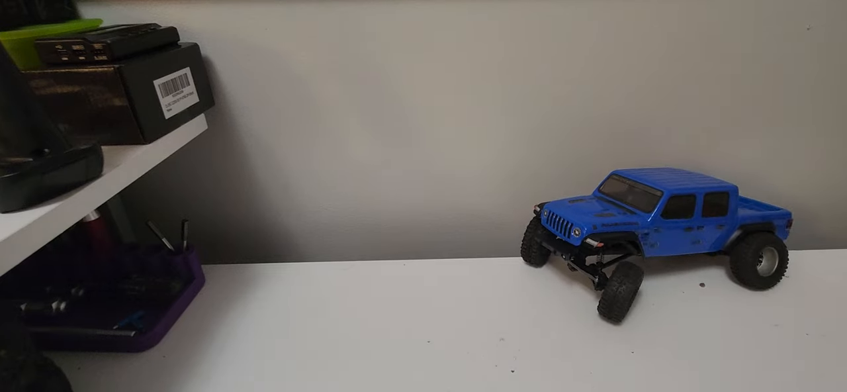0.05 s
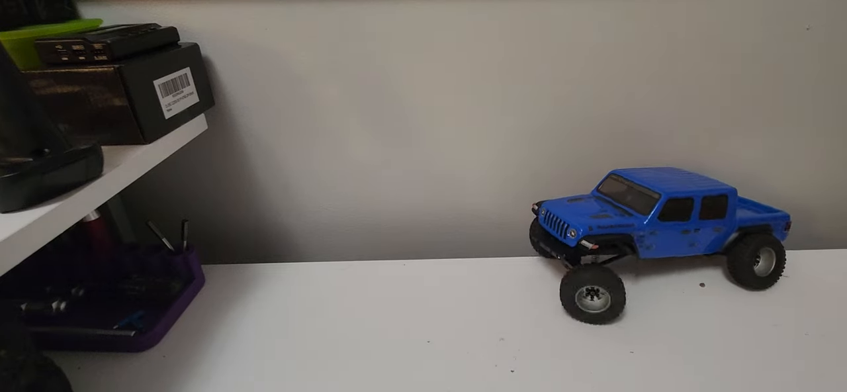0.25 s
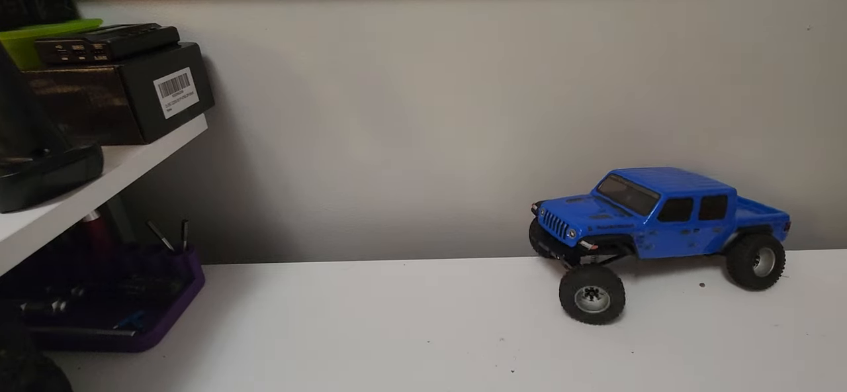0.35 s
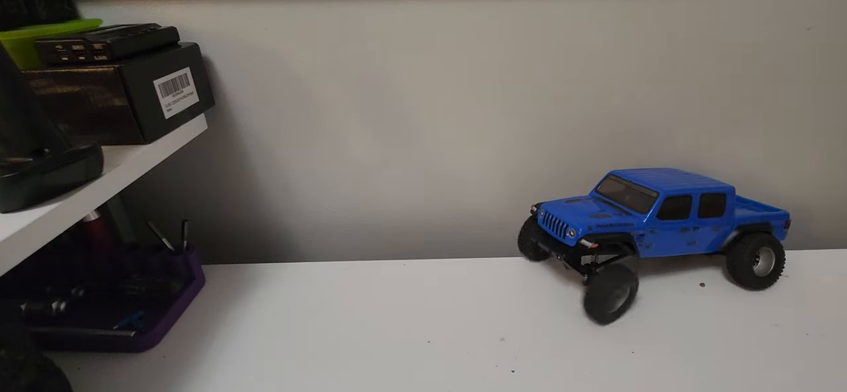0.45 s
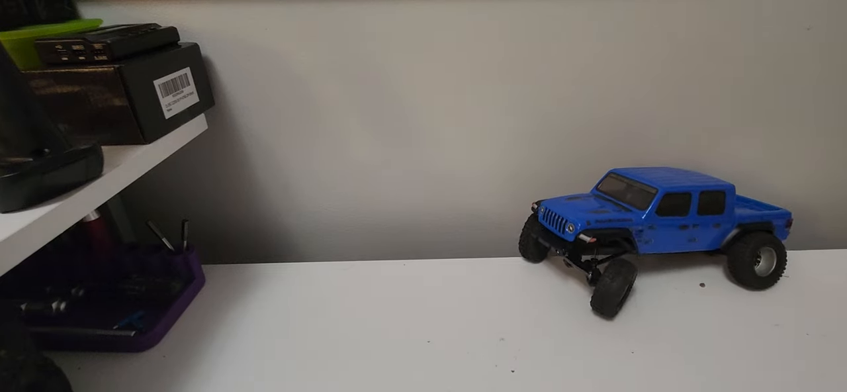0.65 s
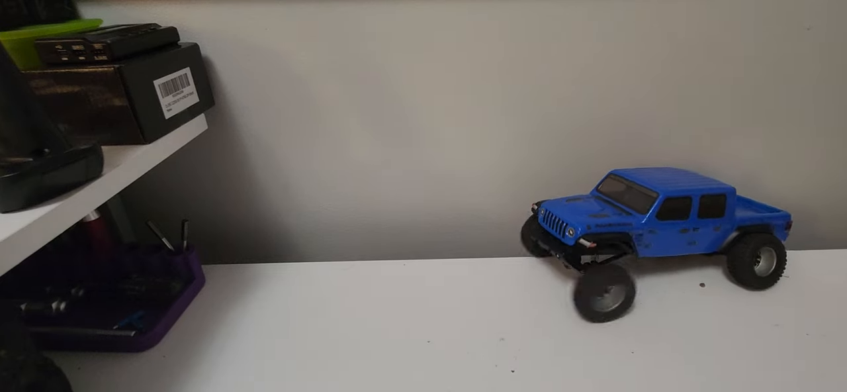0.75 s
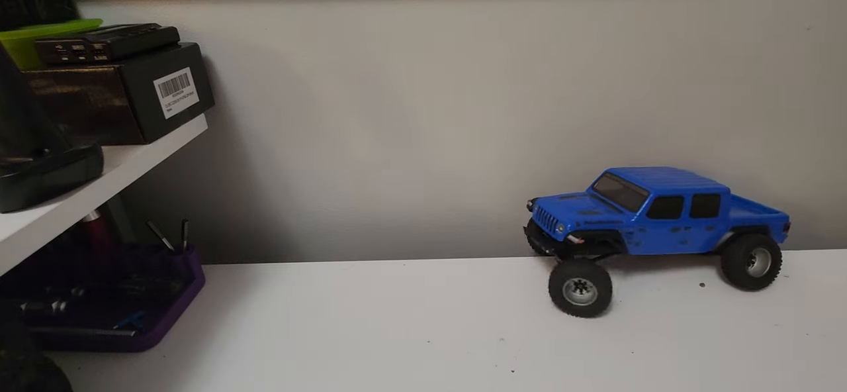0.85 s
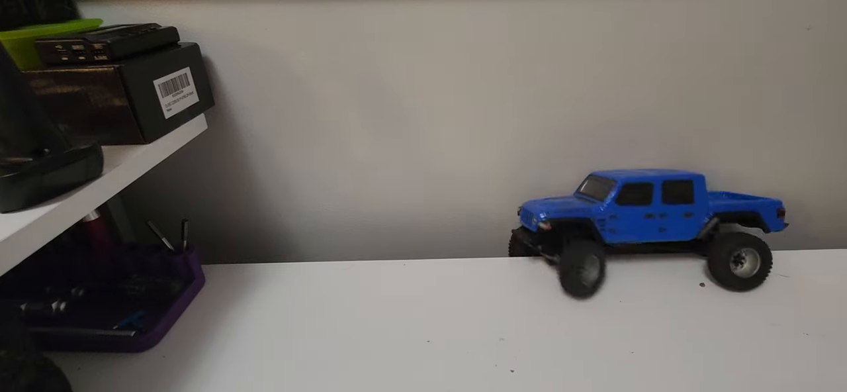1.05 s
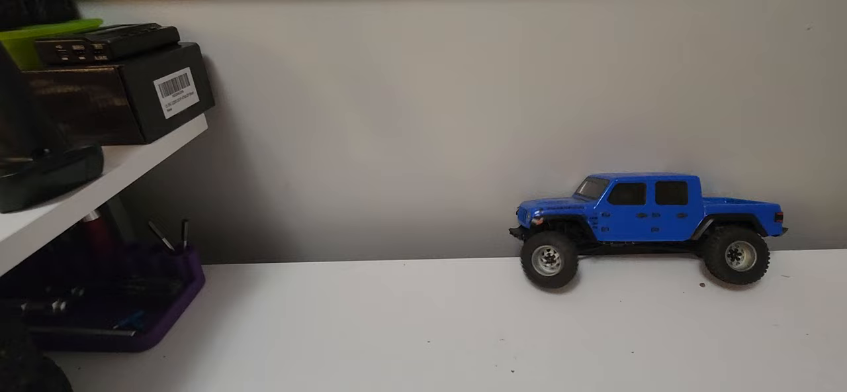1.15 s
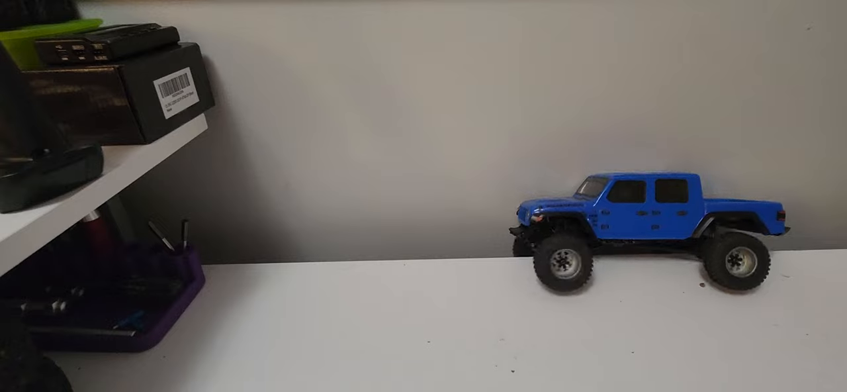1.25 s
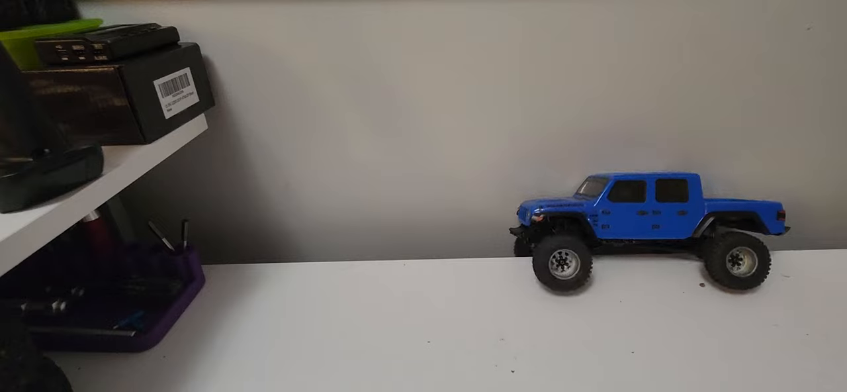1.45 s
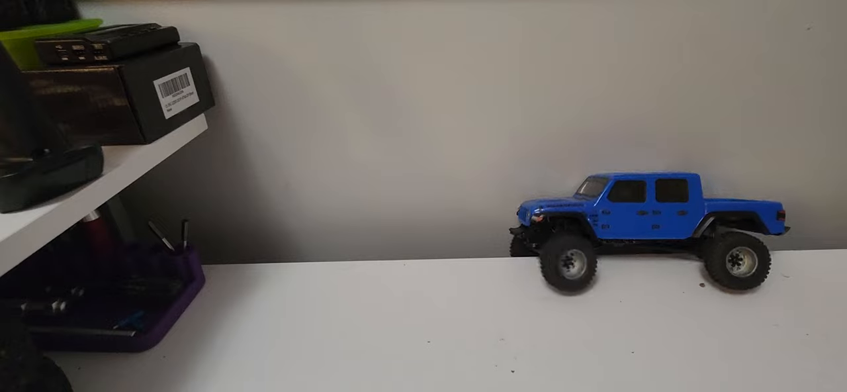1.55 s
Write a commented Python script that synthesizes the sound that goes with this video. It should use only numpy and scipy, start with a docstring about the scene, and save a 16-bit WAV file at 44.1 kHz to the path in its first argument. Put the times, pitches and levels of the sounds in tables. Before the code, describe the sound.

A toy truck's steering servo whirrs over faint low hum, close in a small room. Thin, buzzing gear bursts with ticks and plastic clacks come at about 0.2-0.4, 0.5-0.65 and 0.8-0.95 seconds. A fourth starts at 1.02; loud knocks at 1.1 and 1.2 bring desk ring, clatter and groaning tyres. The whirr wavers until 1.5, then a faint tick at 1.6.

```python
"""A small radio-controlled truck on a desk in a small, quiet room swings its front wheels to and fro.
A faint gear rattle dies away over a quiet hum; then the first of four swings ticks as gear slack is taken up.
In each swing loose links clack, and gear teeth in the steering servo whine, rattle and growl.
On the fourth the truck drops onto the desk: thumps, desk ring and clatter, then rocking and groaning tyres.
The servo hunts for its position, its pitch going up and down, and a last faint tick and rattle follow."""
import sys
import numpy as np
from scipy import signal
from scipy.fft import rfft, irfft, next_fast_len
from scipy.io import wavfile
from scipy.ndimage import uniform_filter1d, map_coordinates

SR = 44100
rng = np.random.default_rng(int(sys.argv[2]) if len(sys.argv) > 2 else 0)


def pcm_store(signal):
    """Save signal as 16-bit PCM."""
    levels = np.round(np.clip(np.atleast_2d(signal), -1, 1) * 32767)
    wavfile.write(sys.argv[1], SR, levels.astype(np.int16).T)


N = 70560  # length in samples

# tone of the quiet background hum: (frequency [Hz], relative level [dB])
HUM_COLOUR = [(20, 7.5), (60, 4.5), (125, 4.5), (250, -7.5), (500, -19.5), (950, -18), (2000, -29),
              (4200, -37.5), (5500, -23.5), (8000, -54), (16000, -41)]
HUM_DB = -58.5

# tone of the direct sound, its treble shaded by the body: (frequency [Hz], level [dB])
DIRECT_COLOUR = [(200, -3), (700, -1), (2000, -1), (6000, -9.5), (16000, -5)]
# tone of the reflections: (frequency [Hz], level [dB])
ECHO_COLOUR = [(40, -36), (150, -11.5), (300, -12), (600, -3.5), (3000, 3.5), (8000, 1.5), (16000, -6.5)]
EARLY_DB, EARLY_T60_S, EARLY_DELAY_S = 0, 0.02, 0.0008
TAIL_DB, TAIL_T60_S, TAIL_DELAY_S = -6.5, 0.21, 0.007
ROOM_EVEN_HZ = 200  # width of the bands that are evened out
LEFT_LAG_S = 0.00007  # the truck stands to the right, so the left side hears it later
LOW_CUT_HZ, TOP_HZ = 31.6, 15850

# the chassis rocking on its soft tyres: (time [s], level [dB], time to fall 60 dB [s])
WOBBLES = [(0.263, -40, 0.7), (0.52, -44.5, 0.68), (0.669, -47.5, 0.3), (0.857, -45, 0.78),
           (1.29, -31, 0.71)]
# tone of that rumble: (frequency [Hz], relative level [dB])
WOBBLE_COLOUR = [(20, -27.5), (50, -3.5), (72, -3), (110, -6.5), (200, -28), (600, -78)]
WOBBLE_RISE_S = 0.0057

# tyres groaning on the desk: (time [s], pitch [Hz], time to fall 60 dB [s], level [dB])
RUBS = [(1.21, 255, .24, -29), (1.256, 975, .1, -34), (1.336, 880, .18, -34.5), (1.452, 555, .22, -44)]
RUB_RISE_S = 0.0026
RUB_WAVER, RUB_WAVER_HZ = 0.018, 87.1  # share of the pitch, speed of its wander

# loose body parts clattering after the landings: (time [s], level [dB], time to fall 60 dB [s])
CLATTERS = [(1.099, -34, 0.22), (1.173, -36, .08), (1.196, -25.5, 0.13), (1.223, -37, 0.3)]
CLATTER_PER_S, CLATTER_LOW_HZ, CLATTER_HIGH_HZ = 1300, 383, 2200
CLATTER_CYCLES = 18  # swings until a chatter has fallen 60 dB
CLATTER_SCATTER_DB, CLATTER_PAN_DB = 3, 6.5

# wheels and chassis landing: (time [s], thump level [dB], thump pitch [Hz], desk ring level [dB],
# crash level [dB], time for the crash to fall 60 dB [s], crash low-pass [Hz])
KNOCKS = [(1.095, -13.5, 88.7, -24, -7, 0.031, 8994), (1.101, -21, 114.5, -29, -34.5, 0.18, 2982),
          (1.1702, -54, 99, -43, -20, 0.057, 12000), (1.1727, -18.5, 104, -25, -23, 0.13, 2550),
          (1.195, -24, 153.3, -20.5, -12, 0.03, 3950), (1.2023, -24, 188.3, -27.5, -14.5, 0.091, 1790),
          (1.214, -36, 211, -31.5, -27, .05, 3000), (1.2227, -42, 136.3, -28.5, -16, 0.046, 1200)]
# ringing of wheel and chassis: (multiple of the thump pitch [-], time to fall 60 dB [s], level [dB])
THUMP_MODES = [(1, 0.085, 6.5), (3.9, 0.13, -6.5), (12.7, 0.06, -9)]
# ringing of the desk top: (frequency [Hz], time to fall 60 dB [s], level [dB])
DESK_MODES = [(53, 0.59, 1), (80.5, 0.41, 1.5), (117.3, 0.55, -9), (145.5, 0.22, 0), (192.7, 0.437, -6.5),
              (239.8, 0.52, -9), (258.7, 0.35, -2), (357, 0.15, -4), (459, 0.23, -11.5), (654, 0.15, -17),
              (747, 0.057, -10)]
# tone of the shaken plastic body: (frequency [Hz], relative level [dB])
CRASH_COLOUR = [(50, -17), (150, 9), (300, 1), (500, 6.5), (750, -3.5), (1200, 1.5), (1700, -9.5),
                (2400, -11.5), (3800, -9.5), (5300, -10), (9000, -16), (16000, -4.5)]

# clacks of the steering links, and dull bumps of the servo at its end stops: (time [s], level [dB], # time to
# fall 60 dB [s], low-pass [Hz], axle ring level [dB])
CLACKS = [(0.2373, -27, 0.054, 11900, -39), (0.349, -33.5, 0.073, 1070, -56),
          (0.4893, -26, 0.049, 14000, -43), (0.531, -40.5, 0.081, 2500, -59),
          (0.598, -47, 0.023, 3500, -65), (0.862, -31.5, 0.034, 3470, -38.5),
          (0.977, -40, 0.089, 6952, -66), (1.0432, -27.5, 0.068, 12000, -39.5),
          (1.346, -32.5, 0.067, 1610, -55)]
# tone of the links: (frequency [Hz], relative level [dB])
CLACK_COLOUR = [(120, -39), (300, 0.5), (480, -3), (720, -0.5), (950, -9.5), (1350, 0.5), (1900, -13.5),
                (3200, -10), (5000, -12), (8000, -17.5), (16000, -11)]
# ringing of the axle: (frequency [Hz], time to fall 60 dB [s], level [dB])
AXLE_MODES = [(430, 0.069, 4), (716, 0.063, -5.5)]
CLACK_LOW_CUT_HZ = 360

# ticks of gear slack: (time [s], level [dB], direction [0 left, 1 right])
TICKS = [(0.2055, -33.5, 0), (0.46, -29.5, 1), (0.8204, -35, 0), (1.0157, -30, 1), (1.59, -51, 0)]
# ringing of the steering gear: (frequency [Hz], time to fall 60 dB [s], level turning left [dB],
# level turning right [dB])
GEAR_MODES = [(770, 0.078, -10, -19), (1410, 0.043, 3.5, -27), (1580, 0.11, -28, -9), (1992, 0.016, -12, 0),
              (4476, 0.012, -33, 2.5), (5450, 0.0094, -14, -5), (6400, 0.01, -22, -14)]
# tone of the scrape in a tick: (frequency [Hz], relative level [dB])
TICK_COLOUR = [(250, -12), (900, -7.5), (1450, 7.5), (2400, -6.5), (3300, -5.5), (4400, 4), (6000, 8.5),
               (8000, -0.5), (10000, -7), (16000, -4)]
SCRAPE_DB, SCRAPE_HOLD_S, SCRAPE_T60_S = 1.5, 0.002, 0.0075
TICK_RING_DB, TICK_LOW_CUT_HZ = 0.5, 1120

# meshing gears, one list per swing: (time [s], tooth rate [Hz], lower whine level [dB],
# upper whine level [dB])
MESH = [
    [(.228, 3700, -55, -50), (.246, 3650, -39, -48), (.253, 3740, -27, -46), (.264, 3240, -34, -34),
     (.275, 3280, -36, -44), (.286, 3530, -35, -44), (.295, 3250, -35, -28), (.306, 2910, -28, -34),
     (.326, 3070, -37, -36), (.338, 2950, -29, -32), (.348, 2640, -33, -33), (.365, 2400, -60, -60)],
    [(.497, 3394, -50, -60), (.512, 3607, -31, -52), (.527, 3690, -19, -35), (.536, 3420, -31, -35),
     (.56, 3450, -28, -33), (.576, 3030, -37, -22), (.588, 3043, -40, -28), (.602, 2960, -34, -22.5),
     (.614, 2690, -30, -37), (.63, 2383, -65, -64)],
    [(.825, 3000, -52, -48), (.842, 2790, -31, -32), (.852, 3000, -36, -32), (.863, 3380, -44, -46),
     (.872, 3400, -34, -44), (.879, 3200, -33, -28), (.888, 3040, -40, -39), (.904, 3150, -39, -32),
     (.917, 2960, -29, -36), (.93, 2610, -37, -28), (.945, 2400, -58, -58)],
    [(1.048, 3393, -56, -55), (1.065, 3546, -30, -39), (1.08, 3585, -22.5, -43), (1.1, 3732, -27, -47),
     (1.112, 3230, -54, -41), (1.12, 3007, -38, -24), (1.13, 2589, -32, -28.5), (1.15, 3614, -42, -42),
     (1.2, 3852, -42, -50), (1.213, 3657, -33, -40), (1.225, 3254, -28.5, -41), (1.237, 3593, -52, -43),
     (1.255, 3854, -34.5, -43), (1.272, 3703, -49, -39), (1.3, 2701, -54, -64), (1.317, 3043, -41, -39),
     (1.333, 3432, -35, -39), (1.352, 3702, -42, -34), (1.375, 3764, -75, -59), (1.4, 3917, -40, -42),
     (1.435, 3667, -72, -57), (1.46, 3913, -45, -46), (1.49, 3508, -78, -65)],
]
# parts of the whine: (multiple of the tooth rate [-], level [dB], which whine [0 lower, 1 upper])
HARMONICS = [(2, -0.5, -1), (3, -13, 0), (4, 4, 1), (5, -12, 1)]
# how the servo case colours the whine: (frequency [Hz], level [dB])
WHINE_COLOUR = [(2500, -10), (4500, -7), (5600, -4.5), (7200, -0.5), (8300, 6.5), (9700, -10),
                (10600, -3.5), (12100, -0.5), (13600, -0.5), (15000, -0.5), (17000, -4)]
JITTER, JITTER_HZ = 0.004, 500.7  # share of the pitch, speed of its wander
FLUTTER_DB, FLUTTER_HZ = 2, 257

# gear rattle, one list per burst: (time [s], level [dB])
RATTLE = [
    [(0, -49.5), (.03, -74), (.07, -83)],
    [(.17, -71), (.19, -64), (.221, -51.5), (.23, -30.5), (.262, -32), (.277, -33), (.3, -35),
     (.348, -37.5), (.37, -45), (.41, -77)],
    [(.465, -81), (.486, -44), (.493, -40.5), (.515, -26.5), (.55, -33.5), (.61, -31), (.626, -36.5),
     (.65, -70), (.7, -80)],
    [(.77, -57), (.782, -49.5), (.816, -34.5), (.835, -35.5), (.88, -33), (.935, -35.5), (.955, -56),
     (1.0, -83)],
    [(1.02, -47), (1.042, -37), (1.05, -31), (1.097, -32.5), (1.17, -36.5), (1.22, -32), (1.277, -35.5),
     (1.296, -46.5), (1.325, -32), (1.354, -32.5), (1.366, -81), (1.383, -41), (1.396, -30), (1.415, -41),
     (1.438, -46), (1.46, -30.5), (1.474, -40.5), (1.49, -55), (1.53, -70)],
    [(1.556, -82), (1.567, -45.5), (1.589, -42.5), (1.6, -59)],
]
# how the servo case colours the rattle: (frequency [Hz], relative level [dB])
RATTLE_COLOUR = [(150, -39), (600, -31), (1500, -26), (2600, -16), (3600, -21), (4900, -13), (6200, -6),
                 (7600, 4.5), (8700, -5), (9800, -8), (10800, 3), (11900, 5.5), (13800, 0), (15300, -2),
                 (17000, 0)]
# low growl of the loaded gears, one list per swing: (time [s], level [dB])
GROWL = [
    [(.21, -57), (.25, -44), (.3, -50), (.36, -49), (.41, -64.5)],
    [(.465, -52), (.5, -48.5), (.55, -49), (.615, -48.5), (.65, -63.5), (.72, -66)],
    [(.8, -73), (.83, -49.5), (.88, -45.5), (.94, -48), (1.0, -65.5)],
    [(1.02, -57.5), (1.09, -42.5), (1.27, -42), (1.38, -55.5), (1.47, -59), (1.53, -87)],
]
# tone of the growl: (frequency [Hz], relative level [dB])
GROWL_COLOUR = [(120, -25.5), (250, -8), (450, -2), (600, -6.5), (780, 8.5), (1100, -5), (1800, -9.5),
                (2600, -9), (3600, -16.5), (6000, -29.5)]
TOOTH_SCATTER_DB, TEETH_PER_TURN, TURN_DEPTH = 2.5, 10, 0.66
SNAG_SHARE, SNAG_DB = 0.04, 13  # share of the teeth that snag, and how much louder they click
SIDEBAND_DB, SIDEBAND_SPREAD_DB, SIDEBAND_CHANGE_HZ = -1, 5, 55

# thin squeals of the motor: (centre [s], half length [s], pitch [Hz], glide [Hz per s], level [dB])
SQUEALS = [(0.26, .007, 14700, 0, -19.5), (.308, 0.013, 15350, 35002, -27), (.844, .011, 14850, 25000, -28),
           (0.887, 0.011, 15250, 15000, -24), (1.216, .006, 15200, 13, -29),
           (1.269, .014, 14600, 20015, -34)]
# uneven loudness of the servo case: (frequency [Hz], left minus right [dB])
CASE_BALANCE = [(500, 1), (1300, 1.5), (4000, 3), (6000, 0.5), (7200, -6), (8500, 0.5), (12000, -4),
                (15000, 8.5)]
SERVO_DB = 0.5


def undb(db):
    """Turn decibels into a gain."""
    return 10 ** (np.asarray(db) / 20)


def unit(x):
    """Scale to an average (rms) strength of 1."""
    return x / np.sqrt(np.mean(x ** 2))


def colour(x, points):
    """Shape the tone through (Hz, dB) points with a filter that never sounds ahead of its input."""
    size = next_fast_len(2 * N)
    size += size % 2
    hz, db = np.array(points, float).T
    bin_hz = np.arange(size // 2 + 1) * SR / size
    log_gain = np.log(undb(np.interp(np.log(bin_hz + 1), np.log(hz), db)))
    # folding the cepstrum onto its first half gives minimum phase
    cepstrum = irfft(log_gain)
    cepstrum[1:size // 2] *= 2
    cepstrum[size // 2 + 1:] = 0
    response = np.exp(rfft(cepstrum))
    return irfft(rfft(x, size) * response)[..., :N]


def noise(points):
    """Coloured noise of strength 1."""
    return unit(colour(rng.standard_normal(N), points))


def soften(x, hz):
    """Gently dull the sound above a frequency."""
    low_pass = signal.butter(1, min(hz, SR / 2 - SR / 20), fs=SR, output="sos")
    return signal.sosfilt(low_pass, x)


def low_cut(x, hz):
    """Remove the bass below a frequency (second-order high-pass)."""
    return signal.sosfilt(signal.butter(2, hz, "high", fs=SR, output="sos"), x)


def walk(hz):
    """Random wander of strength 1, joining hz random points per second with straight lines."""
    points = rng.standard_normal(N // 10)
    return unit(map_coordinates(points, [np.arange(N) * hz / SR], order=1, mode="wrap"))


def since(start):
    """Seconds since a moment, 0 before it."""
    return np.maximum(np.arange(N) / SR - start, 0)


def fade(start, t60):
    """Start suddenly, then die away by 60 dB in t60 seconds."""
    age = since(start)
    return (age > 0) * np.exp(-np.log(1000) * age / t60)


def ring(start, modes, detune=0.0123):
    """A struck object rings at several pitches (Hz, t60, dB), a little different on each blow."""
    out = 0
    for hz, t60, db in modes:
        pitch = hz * (1 + detune * rng.standard_normal())
        out = out + undb(db) * fade(start, t60) * np.sin(2 * np.pi * pitch * since(start))
    return out


def level_curve(pieces, axis=1):
    """Gain over time from one dB column of each piece; silent between the pieces."""
    t = np.arange(N) / SR
    gain = 0
    for piece in map(np.array, pieces):
        active = (t > piece[0, 0]) * (t < piece[-1, 0])
        gain = gain + undb(np.interp(t, piece[:, 0], piece[:, axis])) * active
    return gain


def hum():
    """The quiet background is steady noise, strongest in the bass."""
    return undb(HUM_DB) * noise(HUM_COLOUR)


def room(x):
    """Desk and wall reflect quickly, then a short tail; random on each side but even from band to band."""
    early, tail = fade(EARLY_DELAY_S, EARLY_T60_S), fade(TAIL_DELAY_S, TAIL_T60_S)
    envelope = (undb(EARLY_DB) * unit(early) + undb(TAIL_DB) * unit(tail)) / np.sqrt(N)
    click = signal.unit_impulse(N)
    direct = rfft(colour(click, DIRECT_COLOUR), 2 * N)
    walls = rfft(colour(click, ECHO_COLOUR), 2 * N)
    echoes = rfft(envelope * rng.standard_normal((2, N)), 2 * N)
    response = direct + walls * echoes
    # divide out broad random peaks and dips
    expected = abs(direct) ** 2 + abs(walls) ** 2 * np.sum(envelope ** 2)
    uneven = abs(response) ** 2 / expected
    size = int(ROOM_EVEN_HZ * 2 * N / SR)
    smooth = uniform_filter1d(uniform_filter1d(uneven, size), size)
    return irfft(rfft(x, 2 * N) * response / np.sqrt(smooth))[:, :N]


def wobbles():
    """The truck rocks on its tyres and sends a faint rumble into the desk."""
    level = 0
    for start, db, t60 in WOBBLES:
        rise = 1 - np.exp(-since(start) / WOBBLE_RISE_S)
        level = level + undb(db) * fade(start, t60) * rise
    return noise(WOBBLE_COLOUR) * level


def rubs():
    """Rubber tyres creep on the desk with brief groans of unsteady pitch."""
    out = 0
    for start, hz, t60, db in RUBS:
        pitch = hz * (1 + RUB_WAVER * walk(RUB_WAVER_HZ))
        phase = 2 * np.pi * np.cumsum(pitch) / SR
        rise = 1 - np.exp(-since(start) / RUB_RISE_S)
        out = out + undb(db) * fade(start, t60) * rise * np.sin(phase)
    return out


def clatter():
    """Many small plastic parts chatter after each landing, each with its own pitch and place."""
    grains = np.zeros((2, 2 * N))
    age = np.arange(N // 32) / SR
    for when, pitch, size, side in rng.random((int(CLATTER_PER_S * N / SR), 4)):
        hz = CLATTER_LOW_HZ * (CLATTER_HIGH_HZ / CLATTER_LOW_HZ) ** pitch
        grain = np.sin(2 * np.pi * hz * age) * np.exp(-np.log(1000) * age * hz / CLATTER_CYCLES)
        size_db = CLATTER_SCATTER_DB * -np.log(1 - size)  # mostly small, now and then large
        pan_db = CLATTER_PAN_DB * (2 * side - 1) * np.array([[1], [-1]])
        first = int(when * N)
        grains[:, first:first + len(age)] += undb(size_db + pan_db) * grain
    level = sum(undb(db) * fade(start, t60) for start, db, t60 in CLATTERS)
    return unit(grains[:, :N]) * level


def knocks():
    """Each landing thumps through a wheel, rings the desk top and shakes the plastic body."""
    out, shell = 0, noise(CRASH_COLOUR)
    for start, thump_db, thump_hz, desk_db, crash_db, t60, hz in KNOCKS:
        thump = ring(start, [(k * thump_hz, decay, db) for k, decay, db in THUMP_MODES])
        # neighbouring desk modes swing opposite ways
        desk = ring(start, DESK_MODES[1::2]) - ring(start, DESK_MODES[::2])
        crash = soften(shell * fade(start, t60), hz)
        out = out + undb(thump_db) * thump + undb(desk_db) * desk + undb(crash_db) * crash
    return out


def clacks():
    """Loose plastic links knock and ring the axle as the wheels start turning; the servo bumps its end stops as
    they stop."""
    out, links = 0, noise(CLACK_COLOUR)
    for start, db, t60, hz, axle_db in CLACKS:
        knock = soften(links * fade(start, t60), hz)
        out = out + undb(db) * knock + undb(axle_db) * ring(start, AXLE_MODES)
    return out


def ticks():
    """Gears take up their slack with a brief scrape; each direction rings them differently."""
    out, scrape = 0, noise(TICK_COLOUR)
    for start, db, right in TICKS:
        modes = [(hz, t60, right_db if right > .5 else left_db)
                 for hz, t60, left_db, right_db in GEAR_MODES]
        # full strength for a moment, then a quick decay
        decay = np.exp(-np.log(1000) * since(start + SCRAPE_HOLD_S) / SCRAPE_T60_S)
        contact = (since(start) > 0) * decay
        tick = undb(TICK_RING_DB) * ring(start, modes) + undb(SCRAPE_DB) * scrape * contact
        out = out + undb(db) * tick
    return out


def squeals():
    """The motor gives brief, very high squeals that swell and fade as it changes speed."""
    out = 0
    for centre, half, hz, glide_hz, db in SQUEALS:
        age = np.arange(N) / SR - centre
        glide = glide_hz * np.clip(age, -half, half)
        pitch = (hz + glide) * (1 + JITTER * walk(JITTER_HZ))
        swell = np.exp(-(age / half) ** 2)
        out = out + undb(db) * swell * np.sin(2 * np.pi * np.cumsum(pitch) / SR)
    return out


def tooth_blows(phase, turn):
    """Each tooth hits with its own strength, a few snag, and all throb once per motor turn."""
    tooth = (phase / (2 * np.pi)).astype(int)
    scatter_db = TOOTH_SCATTER_DB * rng.standard_normal(N)
    snag_db = SNAG_DB * (rng.random(N) < SNAG_SHARE)
    return undb(scatter_db + snag_db)[tooth] * (1 + TURN_DEPTH * np.sin(turn))


def growl(blows):
    """The loaded gears growl: noise pulsed by the tooth blows, with a low tone."""
    grind = blows * rng.standard_normal(N)
    return unit(colour(grind, GROWL_COLOUR)) * level_curve(GROWL)


def sidebands(turn):
    """Uneven teeth repeat every motor turn: multiples of its speed, each swelling and fading alone."""
    out = 0
    for k in range(8, 54):
        swell = undb(SIDEBAND_SPREAD_DB * walk(SIDEBAND_CHANGE_HZ))
        out = out + swell * np.sin(k * turn + 2 * np.pi * rng.random())
    return unit(out)


def rattle(blows, turn):
    """Teeth rattle in the case: noise pulsed by the blows, plus tones that glide with the speed."""
    grind = unit(blows * rng.standard_normal(N)) + undb(SIDEBAND_DB) * sidebands(turn)
    return unit(colour(grind, RATTLE_COLOUR)) * level_curve(RATTLE)


def whine(phase):
    """Meshing teeth whine at multiples of the tooth rate, each fluttering in level."""
    lower, upper = level_curve(MESH, axis=2), level_curve(MESH, axis=3)
    out = 0
    for k, db, high in HARMONICS:
        flutter = undb(db + FLUTTER_DB * walk(FLUTTER_HZ))
        out = out + flutter * np.sin(round(k) * phase) * (upper if high > .5 else lower)
    return colour(out, WHINE_COLOUR)


def servo():
    """One wandering tooth rate drives whine, rattle and growl together; the motor's squeals are added."""
    rows = np.vstack(MESH)
    tooth_hz = np.interp(np.arange(N) / SR, rows[:, 0], rows[:, 1])
    tooth_hz = tooth_hz * (1 + JITTER * walk(JITTER_HZ))
    phase = 2 * np.pi * np.cumsum(tooth_hz) / SR
    turn = phase / TEETH_PER_TURN
    blows = tooth_blows(phase, turn)
    return whine(phase) + rattle(blows, turn) + growl(blows) + squeals()


def scene():
    """Hum, blows and servo sound in the room, the truck to the right; the ticks and clacks carry no deep bass."""
    small_parts = low_cut(ticks(), TICK_LOW_CUT_HZ) + low_cut(clacks(), CLACK_LOW_CUT_HZ)
    others = room(hum() + wobbles() + rubs() + clatter() + knocks() + small_parts)
    left, right = room(undb(SERVO_DB) * servo())
    # half of the balance goes to each side
    gears_left = colour(left, [(hz, db / 2) for hz, db in CASE_BALANCE])
    gears_right = colour(right, [(hz, -db / 2) for hz, db in CASE_BALANCE])
    left, right = others + np.array([gears_left, gears_right])
    late_left = np.pad(left, (round(LEFT_LAG_S * SR), 0))[:N]
    return np.array([late_left, right])


def record(dry):
    """Filters cut the deepest bass twice over and the top of the treble steeply."""
    thin = low_cut(low_cut(dry, LOW_CUT_HZ), LOW_CUT_HZ)
    return signal.sosfilt(signal.ellip(10, .2, 80, TOP_HZ, fs=SR, output="sos"), thin)


dry = scene()
out = record(dry)
pcm_store(out)
```